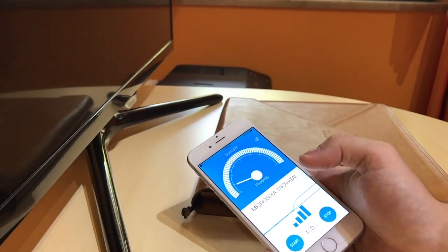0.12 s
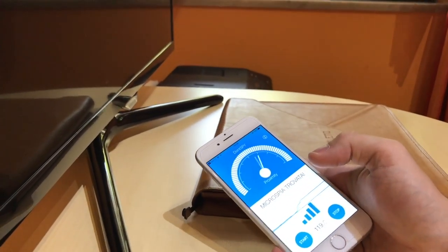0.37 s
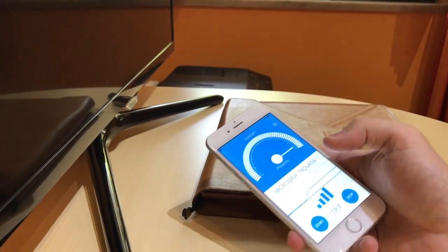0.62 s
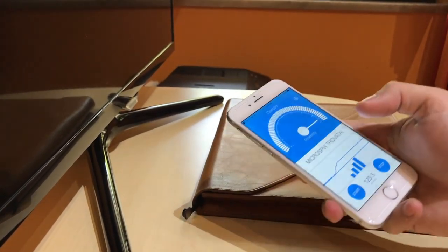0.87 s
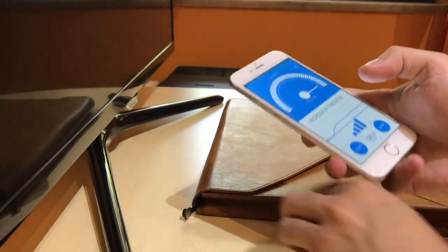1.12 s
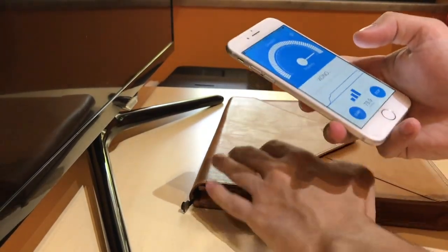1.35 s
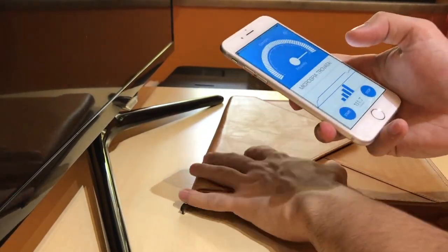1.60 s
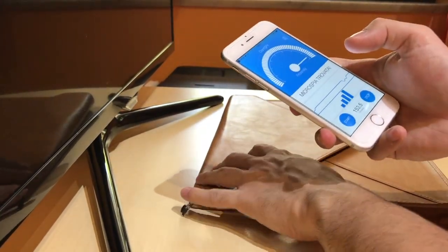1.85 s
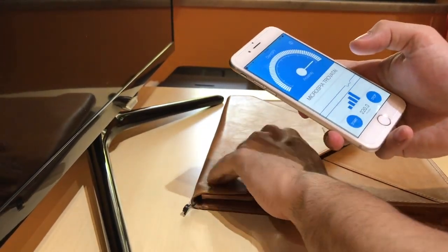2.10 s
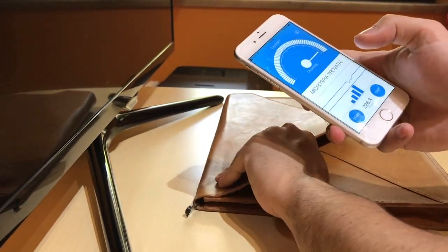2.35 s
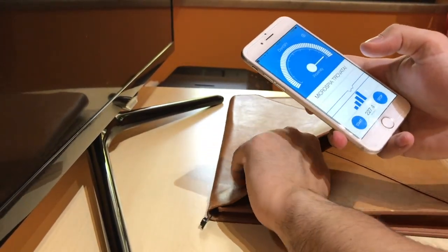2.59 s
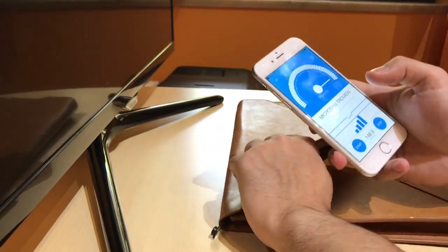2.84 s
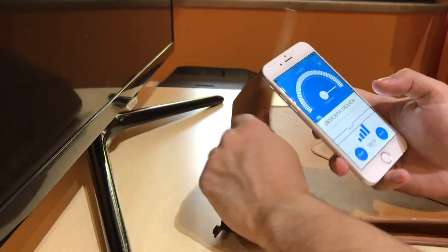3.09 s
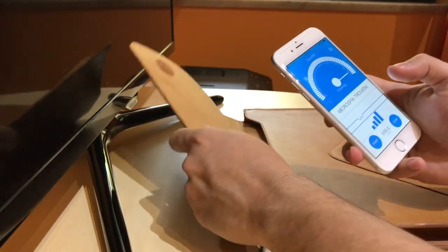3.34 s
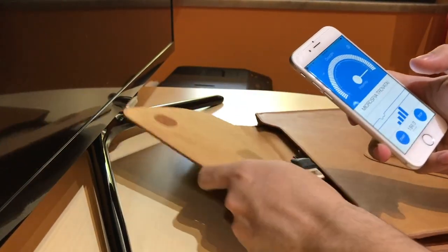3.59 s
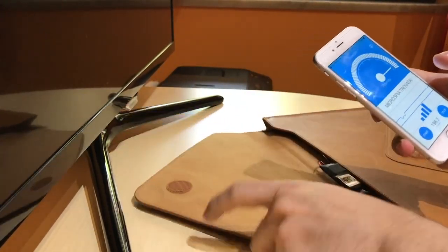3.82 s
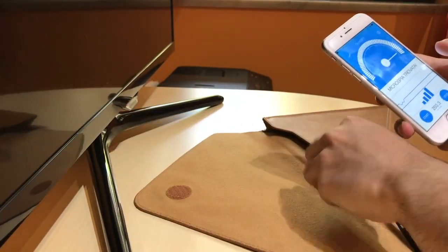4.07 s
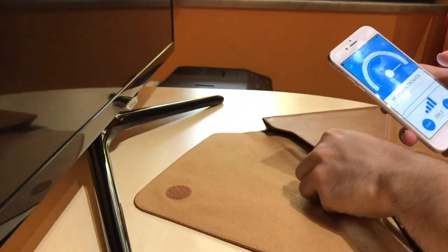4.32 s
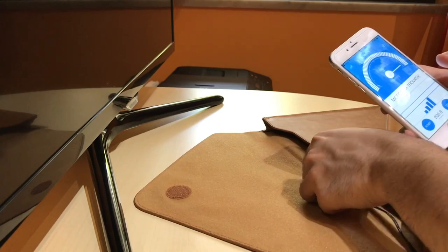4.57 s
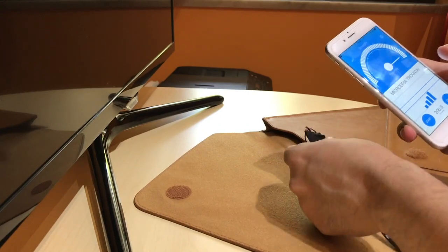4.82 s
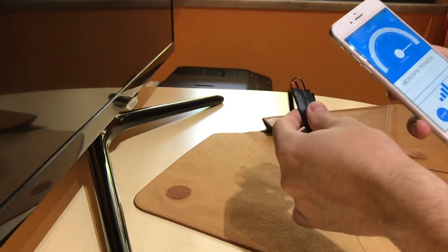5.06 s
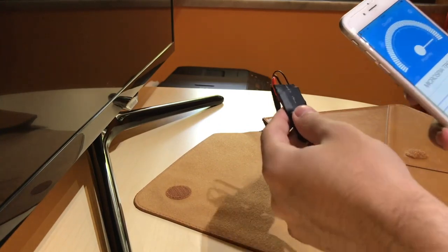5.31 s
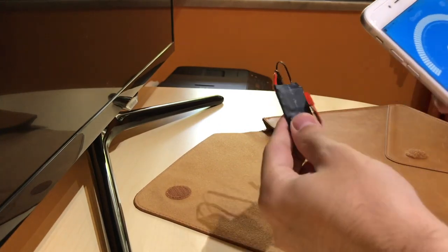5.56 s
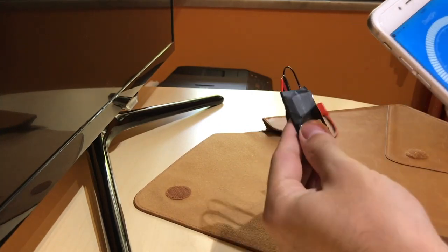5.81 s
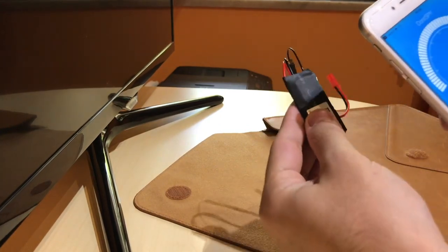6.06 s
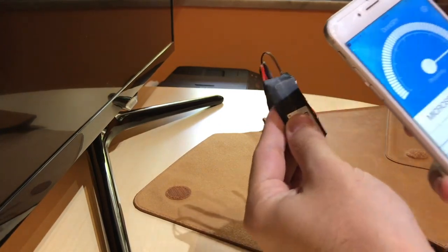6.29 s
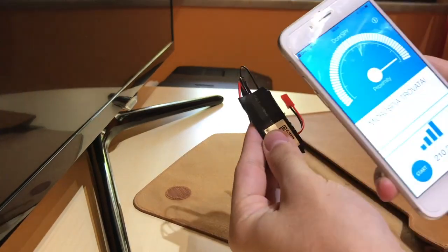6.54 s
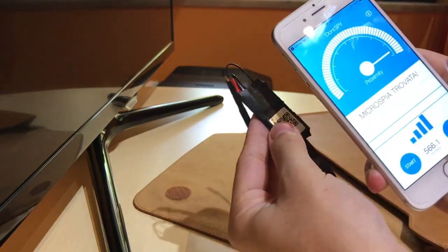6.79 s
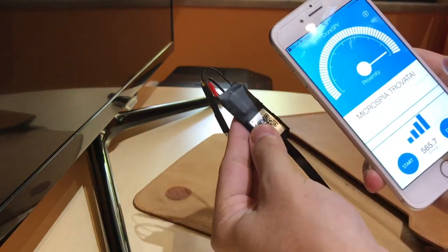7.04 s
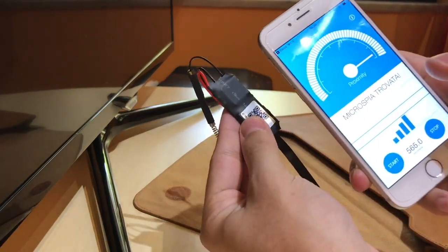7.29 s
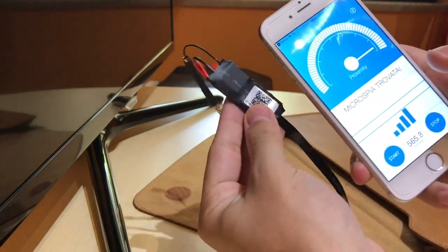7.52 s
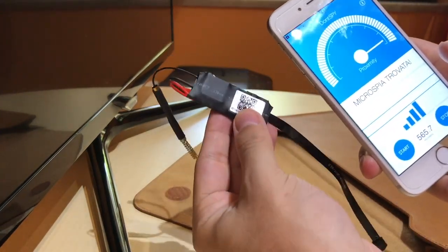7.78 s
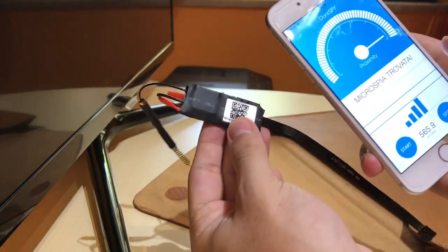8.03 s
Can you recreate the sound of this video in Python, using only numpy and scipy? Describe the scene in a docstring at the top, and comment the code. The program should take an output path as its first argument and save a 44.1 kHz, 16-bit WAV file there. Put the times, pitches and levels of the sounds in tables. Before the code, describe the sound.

Quiet room air with a barely audible electronic whine and a very high insect hiss swelling three times a second. Small leather ticks and a soft thump at 0.4 s, then firmer snaps, scuffs and dull desk thumps at 0.9, 1.1 and 1.3 s, with low rumble underneath. From about 1.3 s a distant cicada chirps steadily, roughly eleven times a second, strongest near 4 s. Leather rubs from 1.6 s; dense crackling creases at 2.3 to 2.6 s, more at 2.9, then the loudest moment, a short sticky two-jerk rip at 3.05 to 3.1 s with a thump and brief rustle. Rubbing and a few knocks continue to 4 s. Faint scuffs, then a flurry of dry tape ticks from 4.7 to 5.2 s, growing brighter. Thin faraway squeals waver at 5.2 to 6.2 s. After that, almost only air and insects, with one tiny scuff near 7.9 s.

```python
"""Quiet room air with a faint electronic whine, a high insect swelling and, soon, a cicada chirping outside a window.
A hand opens a stiff leather sleeve on a desk, tears its sticky flap loose and pulls a small taped device out.
Creases, glue threads, ticks and rubs are noise rung through the sleeve's modes; desk thumps are decaying sines;
a small room rings on after them. Insects and air are filtered noise; thin squeals from far off are gliding sines."""
import sys
import numpy as np
from scipy import signal
from scipy.fft import rfft, irfft
from scipy.io import wavfile
from scipy.ndimage import uniform_filter1d

SR = 44100
rng = np.random.default_rng(int(sys.argv[2]) if len(sys.argv) > 2 else 0)


def unload_audio(sound):
    """Save the sound as a 16-bit wav file, at the path given as the first command line argument."""
    columns = np.transpose(np.atleast_2d(sound))
    # keep every value between -1 and 1, then stretch to whole-number steps
    steps = np.round(np.clip(columns, -1, 1) * 32767)
    wavfile.write(sys.argv[1], SR, steps.astype(np.int16))


def voltage_ratio(decibels):
    """Convert decibels (scalar or array-like) to amplitude ratios, 20 dB per decade."""
    exponent = np.asarray(decibels, float) / 20
    return 10 ** exponent


N = 359415
T = np.arange(N) / SR  # s


def level(x, rms_db):
    """Scales x to an rms level."""
    return x * voltage_ratio(rms_db) / np.sqrt(np.mean(x ** 2))


def noise():
    """White noise as long as the scene."""
    return rng.standard_normal(N)


def band(x, lo_hz, hi_hz):
    """Band-pass filter."""
    sos = signal.butter(2, [lo_hz, hi_hz], "bandpass", fs=SR, output="sos")
    return signal.sosfilt(sos, x)


def ring(x, hz, t60_s):
    """One damped mode whose click response peaks near 1."""
    r = np.exp(-np.log(1000) / (t60_s * SR))
    w = 2 * np.pi * hz / SR
    return signal.lfilter([np.sin(w)], [1, -2 * r * np.cos(w), r * r], x)


def curve(rows):
    """Straight lines over time through the rows, one per column after the time."""
    s, *columns = np.transpose(rows)
    return [np.interp(T, s, c) for c in columns]


def walk(rate_hz):
    """Random values held 1 / rate_hz seconds and slewed twice."""
    k = int(SR / rate_hz)
    held = np.repeat(rng.standard_normal(N // k + 1), k)
    return uniform_filter1d(uniform_filter1d(held, k), k)[:N]


def gate(start_s, length_s, edge_s):
    """Opens and closes over straight edges."""
    to_nearest_end = np.minimum(T - start_s, start_s + length_s - T)
    return np.clip(to_nearest_end / edge_s, 0, 1)


# Spectrum of the still air. Each row: frequency in Hz, relative density in dB per Hz.
AIR_COLOUR = [(15, -44), (25, -13.5), (161, 1.5), (301, -9.5), (641, -14.5), (775, -16), (988, -16.5),
              (1440, -18.5), (2910, -20.5), (3620, -22.5), (4610, -14.5), (7110, -21.5), (10400, -29.5),
              (14800, -22.5), (16000, -17)]


def air():
    """Still room air over a wandering rumble, which rises as the desk stirs under leaning hands."""
    air_db, house_db, stir_db = -69, -81.5, -67
    stir_from_s, stir_rise_s, stir_until_s, stir_fade_s = 0.79, 0.13, 3.91, 1.46
    hz, db = np.transpose(AIR_COLOUR)
    log_hz = np.log(np.fft.rfftfreq(N, 1 / SR) + 1)
    colour = voltage_ratio(np.interp(log_hz, np.log(hz), db))
    hiss = level(irfft(rfft(noise()) * colour, N), air_db)
    deep = band(noise(), 47, 79) * voltage_ratio(6.0 * walk(12))
    upper = band(noise(), 100, 240) * voltage_ratio(1.2 * walk(9))
    rumble = level(deep + 0.84 * upper, 0)
    rumble_db = np.interp(T, [stir_from_s, stir_from_s + stir_rise_s, stir_until_s, stir_until_s + stir_fade_s],
                          [house_db, stir_db, stir_db, house_db])
    return hiss + rumble * voltage_ratio(rumble_db)


def whine():
    """The recorder's faint electronic whine: fifteen multiples of one pitch, each weaker than the last."""
    whine_hz = 990.7
    out = np.zeros(N)
    for k in range(1, 16):
        out += voltage_ratio(-96 - 0.5 * k) * np.sin(2 * np.pi * (k * whine_hz * T + rng.random()))
    return out


def high_insect():
    """A hiss near the top of hearing that swells three times a second."""
    swell_hz, first_swell_s = 3.0, 0.29
    swell = 0.33 + np.abs(np.cos(np.pi * swell_hz * (T - first_swell_s))) ** 1.3
    top = band(band(noise(), 14000, 17000), 14000, 17000)
    skirt = band(noise(), 12000, 15000)
    return level(top * swell, -77.5) + level(skirt * swell, -91.5)


# Pace of the song, slowing a little, then hurrying again. Each row: time in seconds, chirps sung so far.
CHIRPS = [(0, .4), (2.9, 32.69), (7.55, 83.35), (8.15, 90.06)]
# Loudness of the song as heard. Each row: time in seconds, level in dB before the chirps shape it.
CICADA_LEVEL = [(0, -105), (.55, -89), (.9, -86), (1.3, -72), (2.3, -72.5), (3.5, -76.5), (4, -68),
                (4.5, -71.5), (6.5, -74.5), (7.5, -75), (7.65, -72.5), (8.15, -73)]
# Cicada resonances. Each row: centre in Hz, width in Hz, relative level in dB, lag in chirps,
# share of the chirp it sounds.
TYMBAL = [(4700, 450, -7, .15, .7), (5300, 260, -3, -.03, .4), (5520, 260, -3, .08, .4),
          (5900, 500, -9, .12, .6), (6600, 600, -3, .22, .7), (7150, 500, 0, .2, .7),
          (7650, 600, -5, .18, .7)]


def cicada():
    """Tymbal clicks blurred by distance; in each chirp the high resonances speak later and mostly longer."""
    upper_db = -7.5  # added above 6200 Hz
    (count,), (heard_db,) = curve(CHIRPS), curve(CICADA_LEVEL)
    click_phase = np.cumsum(150 + 15 * walk(55)) / SR % 1
    tymbal = noise() * (2.1 + np.exp(-click_phase / 0.3))
    effort = voltage_ratio(2.0 * walk(15))
    out = np.zeros(N)
    for k, (hz, width_hz, db, lag, share) in enumerate(TYMBAL):
        away = (count - lag + 0.5) % 1 - 0.5  # chirps from this resonance's peak
        throb = 0.25 + effort * np.exp(-(2 * away / share) ** 2) * 1.2
        body = (-1) ** k * level(band(tymbal, hz - width_hz / 2, hz + width_hz / 2), db)
        out += voltage_ratio(heard_db + upper_db * (hz > 6200)) * body * throb
    return out


# Modes of the sleeve. Each row: pitch in Hz before bending, relative level in dB,
# t60 in seconds before shortening.
LEATHER_MODES = [(327, 7, 0.076), (412, 5.5, 0.076), (614, 4.5, 0.053), (986, 0, 0.021), (1362, 5.5, 0.01),
                 (1797, 6, 0.0088), (3050, 7.5, 0.0045), (3630, 1.5, 0.015), (4360, 5, 0.0045),
                 (5660, -5.5, 0.011), (6450, -4, 0.0064), (9050, -2, 0.0049), (10470, -1, 0.0016),
                 (13480, -5.5, 0.0051), (15000, -23, 0.0065)]
UNBENT = np.ones(len(LEATHER_MODES))


def leather(x, shorten, bend):
    """Bass, middle and treble modes of the sleeve; its shape bends every pitch; it radiates no deep bass."""
    parts = np.zeros((3, len(x)))
    for k, ((hz, db, t60_s), mode_bend) in enumerate(zip(LEATHER_MODES, bend)):
        part = int(hz > 800) + int(hz > 5000)
        mode = ring(x, min(hz * mode_bend, 17000), t60_s * shorten)
        parts[part] += (-1) ** k * voltage_ratio(db) * mode  # neighbours swing in opposition
    return band(band(parts, 300, 19000), 300, 19000)


def snap(rows, crumble_ms, spot_hz, body):
    """A sharp release, then a few ms of crumbling, rung through the sleeve as it lies bent just then."""
    size = 4096
    out, t = np.zeros(N + size), np.arange(size) / SR
    chance = rng.standard_normal((len(rows), size + 2 + len(LEATHER_MODES)))
    for (s, db, bass_db, treble_db), row in zip(rows, chance):
        decay_ms = crumble_ms * np.exp(0.63 * row[-1])
        crumble = 0.28 * row[:size] * np.exp(-t * 1000 / decay_ms)
        release = (t == 0) * np.sign(row[0])
        low, mid, high = leather(crumble + release, 0.38, np.exp(0.074 * row[size:-2]))
        spot = spot_hz * np.exp(0.15 * row[-2])
        mid = body * mid + band(mid, spot / 1.6, spot * 1.89)  # the spot that lets go favours its own modes
        low, mid, high = (p / np.abs(p).max() for p in (low, mid, high))
        i = int(s * SR)
        out[i:i + size] += voltage_ratio(db) * (voltage_ratio(bass_db) * low + mid + voltage_ratio(treble_db) * high)
    return out[:N]


# Creases and contacts of the sleeve letting go, and the loudest glue threads snapping as the flap tears.
# Each row: time in seconds, peak of the middle modes in dB, bass re that peak in dB, treble re that peak in dB.
SLEEVE_SNAPS = [(0.356, -55, -7, -16), (0.427, -61.5, 3, 3), (0.868, -45.5, -4, -7), (0.891, -37, -11, -15),
                (0.955, -38, -13, -19), (1.113, -49, -6.5, 3.5), (1.314, -34.5, -10, -6.5),
                (1.706, -50.5, 2, 1), (2.276, -63, 9, -9), (2.319, -36, -12, 1.5), (2.393, -32.5, -17, 3),
                (2.4, -29, -8, -1), (2.409, -28.5, -8.5, -1.5), (2.475, -31.5, -6.5, -2.5),
                (2.495, -24, -15.5, -2.5), (2.514, -31, -10.5, 7), (2.523, -34.5, -27, 8.5),
                (2.566, -42, -9, -1), (2.624, -47.5, -13, 1.5), (2.68, -44, -10.5, -17),
                (2.763, -56, -23, 8), (2.888, -30.5, -12.5, 3), (2.91, -35.5, -21.5, 7.5),
                (2.982, -35.5, -10, 4.5), (3.027, -38.5, -20, 13), (3.034, -27, -20.5, 2),
                (3.074, -23, -18, -13), (3.084, -17, -7.5, -18), (3.091, -26.5, 6, -18),
                (3.099, -22, -4.5, -26), (3.469, -32, -8.5, -1.5), (3.583, -38, -15.5, 0),
                (3.972, -35.5, -10.5, -9.5)]
# Tape of the device ticking free of the leather. Each row: time in seconds, peak of the middle modes in dB.
TICKS = [(4.725, -52.5), (4.783, -45), (4.81, -42.5), (4.838, -45), (4.866, -37), (4.919, -36.5),
         (4.944, -43), (4.955, -33), (4.963, -52), (4.969, -53), (4.979, -41.5), (4.987, -36),
         (5.038, -46.5), (5.089, -56), (5.11, -66), (5.163, -62), (5.166, -51.5), (5.205, -58.5),
         (5.236, -61), (5.528, -58)]


def snaps():
    """Creases and the loudest glue threads, then drier ticks of tape, brightening as the device emerges."""
    emerges_s, treble_db = (4.85, 5.106), (-13.5, 14.5)  # start and end; inside and outside
    ticks = [(s, db, -22.5, np.interp(s, emerges_s, treble_db)) for s, db in TICKS]
    sleeve = snap(SLEEVE_SNAPS, crumble_ms=1.6, spot_hz=1296, body=1.7)
    return sleeve + snap(ticks, crumble_ms=0.69, spot_hz=2450, body=0.79)


def room(x):
    """Adds a diffuse tail of decaying noise in three bands, shortest in the treble."""
    t = np.arange(SR // 2) / SR
    white = rng.standard_normal((3, len(t)))
    low = voltage_ratio(2.0) * band(white[0], 110, 590) * voltage_ratio(-60 * t / 0.31)
    mid = band(white[1], 720, 4000) * voltage_ratio(-60 * t / 0.37)
    high = voltage_ratio(-1.5) * band(white[2], 5000, 13000) * voltage_ratio(-60 * t / 0.3)
    tail = (low + mid + high) * np.minimum(t / 0.0063, 1)
    return x + voltage_ratio(-35.5) * signal.fftconvolve(x, tail)[:N]


# Soft blows through the desk top. Each row: time in seconds, level in dB before rise and decay, pitch in Hz.
THUMPS = [(0.433, -48, 66), (0.868, -44, 110), (0.901, -49.5, 262), (1.115, -48.5, 107), (1.313, -48, 132),
          (1.69, -57, 60), (2.398, -50, 120), (2.673, -56.5, 88), (3.082, -39, 110), (3.103, -49.5, 65),
          (3.466, -43.5, 181), (3.882, -48.5, 92), (4.647, -69, 296), (4.996, -55, 127)]


def thumps():
    """The palm pushes the desk top, which booms briefly as a decaying sine."""
    t60_s, rise_s = 0.16, 0.0077
    out = np.zeros(N)
    for s, db, hz in THUMPS:
        t = np.maximum(T - s, 0)
        boom = np.sin(2 * np.pi * hz * t) * voltage_ratio(-60 * t / t60_s)
        out += voltage_ratio(db) * boom * np.minimum(t / rise_s, 1)
    return out


def grains(per_s, spread_db, smooth):
    """Fibres slipping: random clicks of very unequal size over a fine hiss."""
    size_db = spread_db * np.minimum(rng.exponential(size=N), 4)
    clicks = (rng.random(N) < per_s / SR) * voltage_ratio(size_db) * noise()
    return level(clicks, 0) + smooth * noise()


# Long strokes of leather rubbing. Each row: start in seconds, length in seconds,
# level of the middle modes in dB at full press, treble re that level in dB.
STROKES = [(1.58, 0.74, -72.5, -1.5), (2.146, 0.79, -64.5, -3), (3.162, 0.93, -62, -7),
           (4.159, 0.93, -73, -2), (4.765, 0.52, -75, -2)]
# Short scuffs of leather and tape, and near 5.95 s a soft faint hiss. Each row: start in seconds,
# length in seconds, level in dB before shaping, lowest frequency in Hz, highest frequency in Hz.
SCUFFS_AND_HISS = [(0.888, 0.018, -53.5, 900, 4000), (0.907, 0.039, -55.5, 885, 15500),
                   (0.951, 0.027, -51.5, 770, 14000), (1.103, 0.081, -60, 890, 14200),
                   (1.315, 0.26, -73.5, 300, 15000), (1.621, 0.064, -64, 910, 2430),
                   (2.327, 0.024, -55.5, 2500, 14000), (2.402, 0.053, -51.5, 400, 6850),
                   (2.488, 0.015, -44, 600, 13800), (2.521, 0.047, -51.5, 1530, 9000),
                   (2.918, 0.017, -53, 1500, 10100), (2.99, 0.023, -56, 1200, 9050),
                   (3.857, 0.1, -62.5, 760, 1420), (3.968, 0.08, -63.5, 760, 1400),
                   (4.023, 0.015, -60, 3000, 14200), (4.304, 0.015, -70, 870, 3520),
                   (4.338, 0.035, -68, 1500, 13100), (4.44, 0.013, -56, 1850, 4000),
                   (4.538, 0.031, -62.5, 1800, 3950), (4.95, 0.07, -61, 1010, 6560),
                   (5.089, 0.008, -54.5, 3100, 13000), (5.158, 0.042, -63, 1500, 14000),
                   (5.946, 0.28, -80, 2280, 3080), (7.856, .04, -72, 690, 2480)]


def rub():
    """Grainy friction that stutters as leather sticks and slips: strokes, scuffs; its noise also gives a faint hiss."""
    press_share, edge_db = 0.383, -6  # share of a stroke spent pressing harder; press at its ends
    rise_share, fall_share = 0.19, 0.33  # of a scuff or the hiss
    friction = grains(2500, 3.0, 1.9) * voltage_ratio(2.5 * walk(50))
    low, mid, high = (level(p, 0) for p in leather(friction, 0.49, UNBENT))
    out = np.zeros(N)
    for s, length_s, db, treble_db in STROKES:
        press_db = np.interp(T, [s, s + press_share * length_s, s + length_s], [edge_db, 0, edge_db])
        stroke = mid + voltage_ratio(treble_db) * high + voltage_ratio(-7.0) * low
        out += gate(s, length_s, 0.1) * voltage_ratio(db + press_db) * stroke
    surface = level(mid + 0.62 * high + 0.5 * low, 0)
    for s, length_s, db, lo_hz, hi_hz in SCUFFS_AND_HISS:
        span = slice(int(s * SR), int((s + length_s) * SR))
        done = np.linspace(0, 1, span.stop - span.start)
        shape = np.minimum(np.minimum(done / rise_share, (1 - done) / fall_share), 1)
        out[span] += voltage_ratio(db) * shape * level(band(surface[span], lo_hz, min(hi_hz, 18000)), 0)
    return out


# The sticky flap tearing off in two jerks. Each row: start in seconds, length in seconds, treble level in dB.
JERKS = [(3.047, .015, -27), (3.066, 0.041, -30.5)]


def rip():
    """Glue threads breaking in a dense crackle; the freed flap rustles on after the last jerk."""
    flap_db, flap_db_per_s = -51.5, -95.5
    threads = grains(3000, 2, 0.6)
    low, mid, high = (level(p, 0) for p in leather(threads, 0.32, UNBENT))
    tearing = sum(voltage_ratio(db) * gate(s, length_s, 0.002) for s, length_s, db in JERKS)
    freed_s = T - JERKS[-1][0] - JERKS[-1][1]
    rustle = (freed_s > 0) * voltage_ratio(flap_db + flap_db_per_s * np.maximum(freed_s, 0))
    return (tearing + rustle) * (voltage_ratio(-9.5) * low + voltage_ratio(-2.5) * mid + high)


# Far thin squeals and hums. Each row: start in seconds, length in seconds, first pitch in Hz, last pitch in Hz,
# level in dB before wavering.
SQUEALS = [(5.28, .2, 1790, 1900, -77), (5.31, .56, 2030, 2000, -73), (5.555, .05, 2015, 2010, -67),
           (5.62, .2, 1620, 1570, -78), (5.88, .3, 2560, 2545, -79), (5.21, .14, 365, 355, -71),
           (3.98, .12, 205, 225, -59)]


def squeals():
    """Narrow gliding tones from far off, wavering in the air on the way."""
    out = np.zeros(N)
    for s, length_s, first_hz, last_hz, db in SQUEALS:
        turns = np.cumsum(np.interp(T, [s, s + length_s], [first_hz, last_hz])) / SR
        waver = 1 + level(band(noise(), 2, 39), -5)
        out += voltage_ratio(db) * gate(s, length_s, length_s / 3) * waver * np.sin(2 * np.pi * turns)
    return out


def scene():
    """Sleeve, tape and desk ring in the room; insects, squeals and air are added as they are."""
    hands = room(snaps() + thumps() + rub() + rip())
    return (air() + high_insect() + cicada() + hands + squeals())[None]


def band_limit(x):
    """A steep low-pass at the top of the band."""
    return signal.sosfilt(signal.butter(12, 16670, fs=SR, output="sos"), x)


def record(dry):
    """Adds the recorder's whine, then a steep top cut."""
    top_hz = 15750
    top_cut = signal.ellip(10, 0.2, 60, top_hz, fs=SR, output="sos")
    mix = signal.sosfilt(top_cut, dry + whine())
    return band_limit(mix)


dry = scene()
out = record(dry)
unload_audio(out)
```